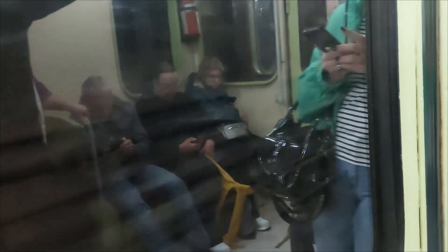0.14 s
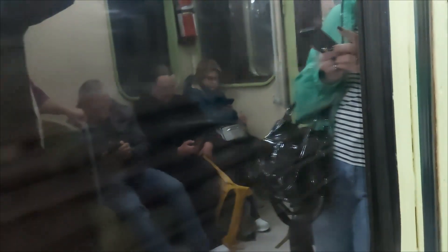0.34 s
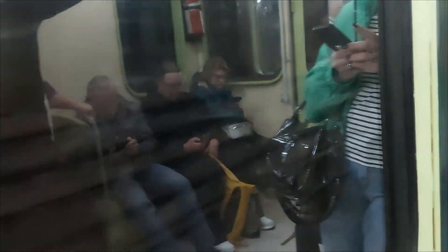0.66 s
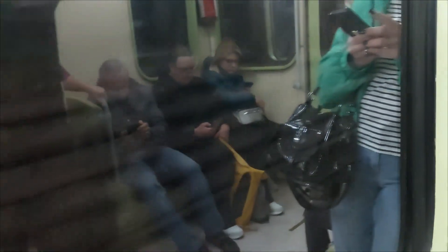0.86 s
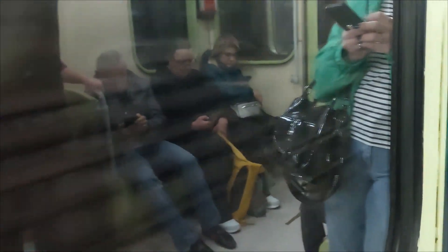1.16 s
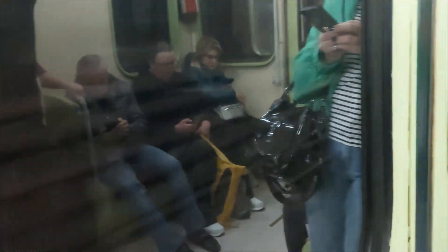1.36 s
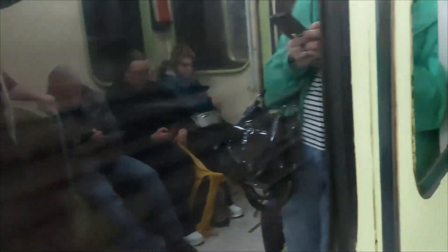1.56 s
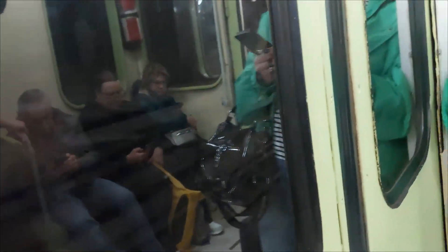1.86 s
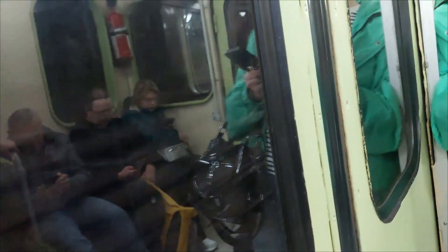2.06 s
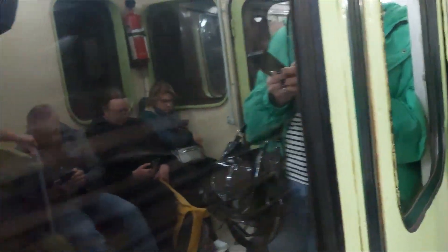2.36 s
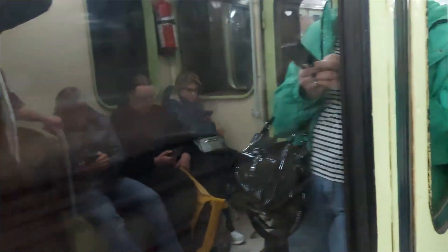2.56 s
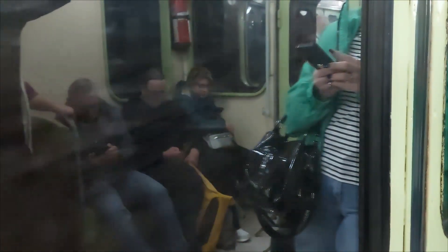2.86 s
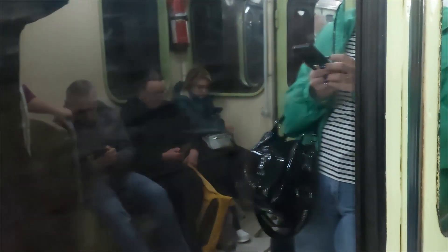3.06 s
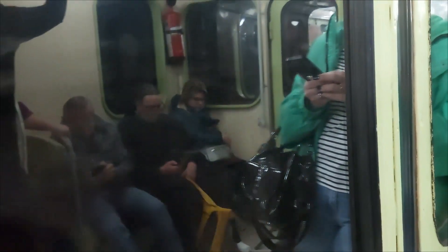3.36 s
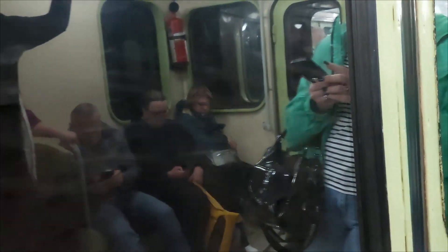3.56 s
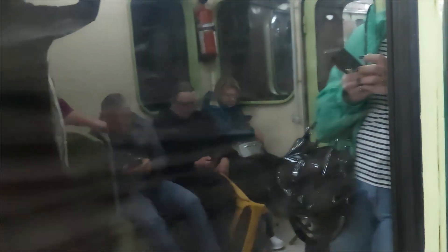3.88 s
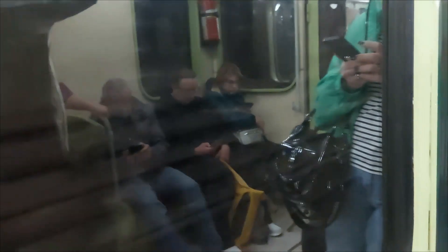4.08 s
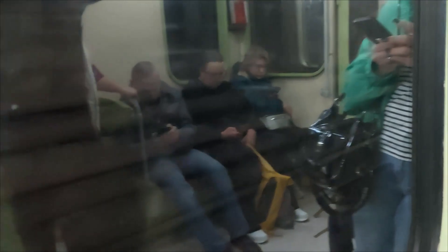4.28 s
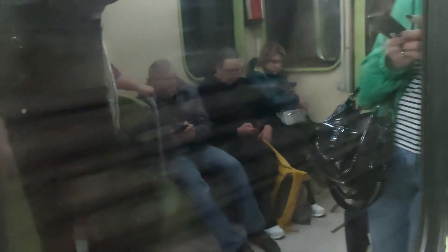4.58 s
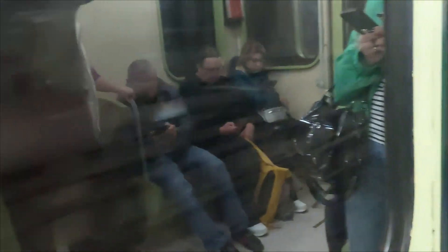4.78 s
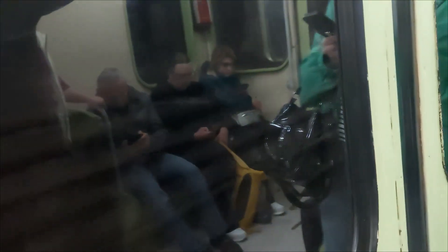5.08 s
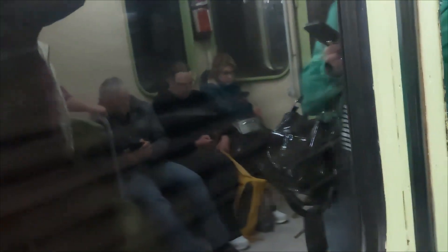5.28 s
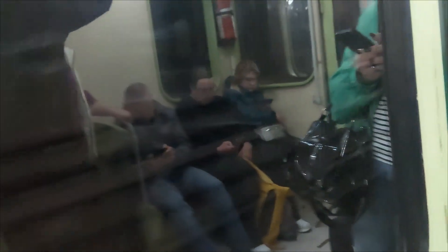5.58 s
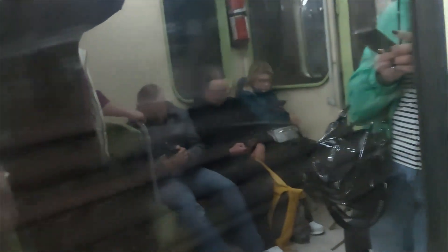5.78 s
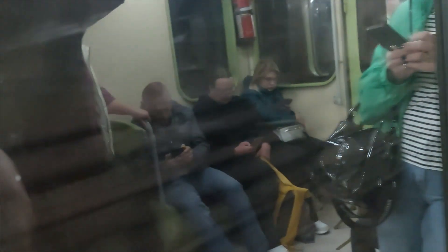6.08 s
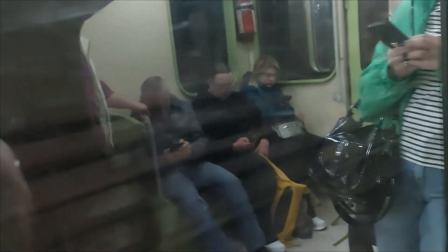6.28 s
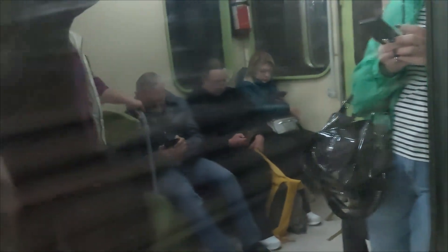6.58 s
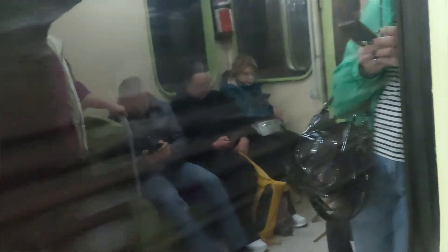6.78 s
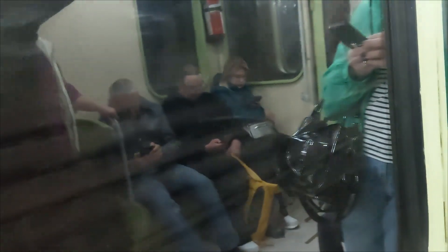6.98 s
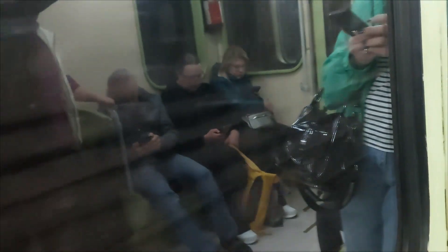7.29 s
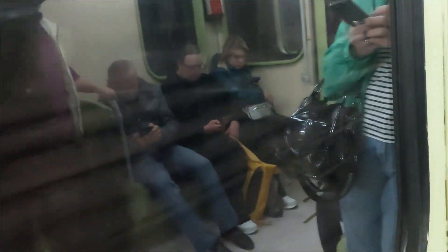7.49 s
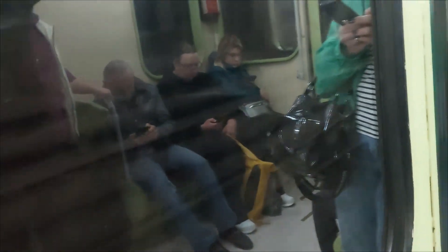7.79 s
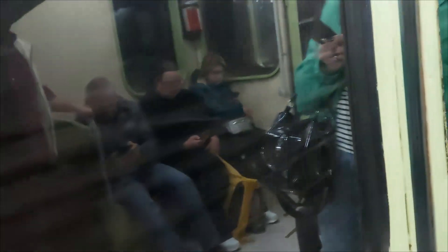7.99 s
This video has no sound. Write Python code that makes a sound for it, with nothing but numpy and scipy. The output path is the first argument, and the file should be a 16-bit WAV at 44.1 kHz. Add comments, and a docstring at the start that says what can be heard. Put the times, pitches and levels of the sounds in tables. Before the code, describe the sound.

Inside a subway car running through a tunnel, a steady wheel roar and floor rumble carry a throbbing low-mid drone that strengthens and rises slightly.

```python
"""Rolling noise inside a metro car in a tunnel: floor rumble, drumming panels, wheel roar and rail hiss from
shaped noise, varying along the track. Rippled rail adds a throbbing drone; gears whine as blurred tones.
Both dip slightly in pitch, then rise with the speed. The body booms and panels ring as narrow noise bands.
A flange grinds in surges, chirps, scrapes and sings faintly; a thin hiss flares and calms on straight track."""
import sys
import numpy as np
from scipy import signal
from scipy.fft import rfft, irfft, next_fast_len
from scipy.io import wavfile
from scipy.ndimage import uniform_filter1d, map_coordinates

SR = 44100
rng = np.random.default_rng(int(sys.argv[2]) if len(sys.argv) > 2 else 0)


def unload_audio(sound):
    """Save the sound as a 16-bit wav file, at the path given as the first command line argument."""
    columns = np.transpose(np.atleast_2d(sound))
    # keep every value between -1 and 1, then stretch to whole-number steps
    steps = np.round(np.clip(columns, -1, 1) * 32767)
    wavfile.write(sys.argv[1], SR, steps.astype(np.int16))


N = 358974
TIME = np.arange(N) / SR


def amp(db):
    """Decibels to gain."""
    return 10 ** (np.asarray(db) / 20)


def unit(x):
    """Scale to rms 1."""
    return x / np.sqrt(np.mean(np.abs(x) ** 2) + 1e-20)


def along(points, hz):
    """Each column of a frequency table, read on a log axis."""
    table_hz, *columns = np.transpose(points)
    return [np.interp(np.log(hz + 1), np.log(table_hz + 1), c) for c in columns]


def curves(rows):
    """One value per sample for each column after the time."""
    time_s, *columns = np.transpose(rows)
    return [np.interp(TIME, time_s, c) for c in columns]


def wobble(rate_hz, size=N):
    """Smooth random curve through rate_hz normal knots a second."""
    knots = rng.standard_normal(int(size * rate_hz / SR) + 4)
    return map_coordinates(knots, [TIME[:size] * rate_hz])


def swell(t, length_s):
    """Bell-shaped rise and fall around t = 0, length_s wide at half height."""
    return np.exp(-np.log(2) * (2 * t / length_s) ** 2)


def filtered(x, response):
    """Apply a response of frequency."""
    m = next_fast_len(N + SR // 2)
    return irfft(rfft(x, m) * response(np.fft.rfftfreq(m, 1 / SR)), m)[..., :N]


def rush(spectrum, patchy_db, resonances=()):
    """Two shaped noises, jointly of rms 1, with shared patches of random gain and lifted resonances."""
    z = signal.stft(rng.standard_normal((2, N)), nperseg=512)[2]
    patches = uniform_filter1d(rng.standard_normal(z.shape[1:]), size=6, axis=0)  # over frequency
    patches = uniform_filter1d(patches, size=16, axis=1)  # over time
    pair = signal.istft(z * amp(patchy_db * unit(patches)), nperseg=512)[1][:, :N]

    def response(hz):
        lift_db = sum(db / (1 + (2 * (hz - centre) / width) ** 2) for centre, width, db in resonances)
        return amp(along(spectrum, hz)[0] + lift_db)
    return unit(filtered(pair, response))


def flutter(width_hz, size=N):
    """Two complex envelopes, jointly of rms 1, that blur a tone; width_hz is taken at half amplitude."""
    m = next_fast_len(size)
    white = rng.standard_normal((2, m)) + 1j * rng.standard_normal((2, m))
    blur = 1 + (np.fft.fftfreq(m, 1 / SR) / (width_hz / 2)) ** 2
    return unit(np.fft.ifft(white / blur)[:, :size])


def bursts(rows):
    """Short swelling bands of noise."""
    out = np.zeros((2, N + 2 * SR))
    t = np.arange(SR) / SR - .5
    for s, hz, width_hz, db, length_s in rows:
        band = np.real(flutter(width_hz, size=SR) * np.exp(2j * np.pi * hz * t))
        start = round((s + .5) * SR)
        out[:, start:start + SR] += amp(db) * np.sqrt(2 * swell(t, length_s)) * band
    return out[:, SR:SR + N]


# level changes along the track: (time [s], length [s], shaking [dB before layer growth],
# roar [dB], boom [dB])
TRACK_CHANGES = [(0.354, .16, -3, -1, 2), (0.616, 0.14, 3, 0.5, -6), (1.66, 0.28, -2, -0.5, 12.5),
                 (1.908, .25, 4.5, -0.3, 2), (2.733, 0.15, 0, 4, 4), (3.191, 0.15, 0.5, 0, -0.5),
                 (4.4, .1, 2, -0.9, 0), (4.95, 0.4, 1, 0, 3.5), (5.425, 0.4, 0, 3, 5),
                 (5.429, .11, 2.5, 0.5, 12), (6.597, .7, 0.5, 0, 4.5), (7.898, 0.23, 0, -2.5, 9.5)]


def track_changes():
    """Brief rises and dips of shaking, roar and boom in dB along the track."""
    return sum(np.outer(change_db, swell(TIME - s, length_s)) for s, length_s, *change_db in TRACK_CHANGES)


# flange contacts: (time [s], rise of rail hiss [dB], hold [s])
GRINDS = [(.01, 3.5, 0.11), (0.427, 4.5, 0.071), (0.607, 3, .04), (0.718, 3.5, 0.033), (0.868, 2.5, 0.033),
          (1.085, 4, .08), (1.262, 3, .08), (1.535, 2.5, .04), (1.737, 4, 0.13), (1.95, 3, 0.067),
          (2.209, 1, .04), (2.345, 3.5, .08), (2.653, 1, 0.16), (3.004, 3, 0.094), (3.587, 1, .06)]
GRIND_ATTACK_S, GRIND_RELEASE_S = 0.035, 0.095


def grinding():
    """Rise in dB: each flange contact sets in before its listed time, holds and dies away."""
    def contact(t, hold_s):
        attack = np.clip(1 + t / GRIND_ATTACK_S, 0, 1)
        return attack * np.exp(-np.maximum(t - hold_s, 0) / GRIND_RELEASE_S)
    return np.max([db * contact(TIME - s, hold_s) for s, db, hold_s in GRINDS], axis=0)


# slow course of the ride: (time [s], floor rumble [dB], panel drumming [dB], rolling roar [dB])
RIDE = [(0, -32, -20, -25), (1.6, -34, -20.5, -25.5), (3.25, -34, -22, -24), (3.7, -36.5, -28, -23.5),
        (5, -36, -24, -21.5), (6.1, -36, -27.5, -26.5), (7, -39.5, -30.5, -27), (8.1, -40.5, -30.5, -26)]
# floor noise shape: (frequency [Hz], relative density [dB])
RUMBLE_SPECTRUM = [(20, -41.5), (33, -24.5), (50, -1.5), (70, -3), (105, -1.5), (135, -11.5), (200, -17.5),
                   (400, -60.5), (1500, -120)]
# floor resonances: (frequency [Hz], width [Hz], lift [dB])
FLOOR_MODES = [(57, 22, 4), (82.4, 20, 9.5), (134, 10, 2.5)]


def rumble():
    """The track shakes the floor, which resonates in the bass."""
    jolt_db = 1.3 * track_changes()[0]
    return amp(curves(RIDE)[0] + jolt_db) * rush(RUMBLE_SPECTRUM, patchy_db=0.0, resonances=FLOOR_MODES)


# panel noise shape: (frequency [Hz], relative density [dB])
PANEL_SPECTRUM = [(30, -61), (70, -22.5), (118, -5), (150, 1), (185, 0), (215, 5.5), (270, 3.5), (380, 1),
                  (435, -5), (490, -10), (800, -32.5), (2500, -120)]


def panels():
    """The shaken panels drum above the floor rumble."""
    jolt_db = 0.83 * track_changes()[0]
    return amp(curves(RIDE)[1] + jolt_db) * rush(PANEL_SPECTRUM, patchy_db=0.87)


# roar shape: (frequency [Hz], relative density [dB])
ROAR_SPECTRUM = [(30, -63), (150, -21), (280, 6.5), (370, 2), (435, 5), (475, -0.5), (560, 4), (680, 0),
                 (790, -3), (1010, -5.5), (1110, -2), (1240, -3.5), (1350, -11), (1800, -20.5),
                 (6000, -120)]


def roar():
    """The wheels roar in the tunnel, varying along the track and surging with the grinding."""
    level_db = curves(RIDE)[2] + track_changes()[1] + 0.95 * grinding()
    return amp(level_db) * rush(ROAR_SPECTRUM, patchy_db=1.0)


# rail hiss shape: (frequency [Hz], relative density [dB])
RAIL_SPECTRUM = [(300, -62), (900, -22), (1500, -2.5), (1800, -0.5), (2250, -0.5), (2700, -4), (3000, -4.5),
                 (3300, -9), (4000, -10.5), (5000, -19), (6000, -23), (7300, -22.5), (8500, -29.5),
                 (16000, -45.5)]
# rail hiss: (time [s], level [dB re roar course])
RAIL_LEVEL = [(0, -18.5), (2.3, -19.5), (3.3, -20), (4.5, -20.5), (5.2, -20), (6.2, -18.5), (8.1, -18)]


def rail_hiss():
    """The rails hiss with the rolling, surging where a flange grinds."""
    level_db = curves(RIDE)[2] + curves(RAIL_LEVEL)[0]
    surge_db = 0.4 * track_changes()[1] + grinding()
    return amp(level_db + surge_db + 0.56 * wobble(45)) * rush(RAIL_SPECTRUM, patchy_db=0.76)


# rail ripples passing the wheels, proportional to speed: (time [s], drone pitch [Hz])
RIPPLE_PITCH = [(0, 318), (2.5, 316), (4, 315), (5.5, 317), (6.3, 321), (7.1, 326), (7.65, 334), (8.1, 337)]


def ripple_phase():
    """Phase of the rail ripples passing under the wheels."""
    return 2 * np.pi * np.cumsum(curves(RIPPLE_PITCH)[0]) / SR


# drone: (time [s], level [dB])
DRONE_LEVEL = [(0, -26), (.7, -22), (1.7, -27.5), (2.5, -23.5), (3.3, -17.5), (3.55, -23.5), (3.75, -17.5),
               (4.35, -19.5), (4.95, -21), (5.9, -16.5), (6.35, -18), (7.1, -17), (7.6, -18), (8.1, -18)]
# loud throbs of the drone: (time [s], peak level [dB], length [s])
THROBS = [(1.307, -12.5, 0.026), (2.849, -14.5, 0.037), (2.987, -14.5, 0.035), (3.191, -12, 0.016),
          (3.264, -15, .044), (3.629, -14.5, 0.016), (3.751, -15, 0.023), (3.824, -11, 0.015),
          (3.983, -13, 0.023), (4.335, -13, 0.03), (4.386, -13, 0.04), (4.586, -15, .03),
          (5.225, -11.5, 0.0087), (5.349, -12, 0.027), (5.461, -14, .025), (5.534, -5.5, 0.02),
          (5.6, -11.5, 0.016), (5.659, -8.5, 0.03), (5.731, -8, 0.019), (5.787, -9, 0.015),
          (5.841, -9, 0.028), (5.918, -10.5, .02), (5.954, -8.5, 0.04), (6.126, -9.5, 0.023),
          (6.272, -6.5, 0.014), (6.305, -8, 0.022), (6.395, -12.5, .04), (6.541, -10, 0.019),
          (6.767, -7.5, 0.032), (6.86, -11, .026), (6.903, -12, .022), (6.998, -8, 0.014),
          (7.08, -7.5, 0.046), (7.154, -8, 0.026), (7.329, -12, 0.03), (7.479, -8, 0.024),
          (7.58, -10, 0.028), (7.701, -12, 0.018)]


def drone(core_db, beat_db, waver_hz):
    """Wheels on rippled rail: a narrow tone with quick random beats and some loud throbs."""
    tone = amp(core_db) * flutter(width_hz=19) + amp(beat_db) * flutter(width_hz=54)
    slow_power = uniform_filter1d(np.abs(tone) ** 2, size=SR // 8, axis=1)
    tone /= np.sqrt(np.abs(slow_power))  # quick beats, even slow level
    tone *= amp(curves(DRONE_LEVEL)[0])
    for s, db, length_s in THROBS:
        throb = swell(TIME - s, length_s)
        heading = np.exp(1j * np.angle(np.sum(throb * tone[0])))
        waver = np.exp(2j * np.pi * waver_hz * rng.standard_normal() * (TIME - s))
        tone[0] += throb * (amp(db) * heading * waver - tone[0])
    return np.sqrt(2) * np.real(tone * np.exp(1j * ripple_phase()))


# gear whine: (time [s], gain [dB])
GEAR_LEVEL = [(0, -58), (3, -53.5), (5.3, -41), (6.2, -37.5), (7.3, -38), (8.1, -38.5)]
# gear lines: (multiple of drone pitch, width [Hz], gain at WHINE_S [dB re gear gain], growth [dB/s])
GEAR_LINES = [(1.49, 29.84, -9, 3.5), (1.97, 69.6, 5.5, 0.5), (2.92, 84.8, 1.5, -2.3),
              (3.2, 54.6, -1.5, 3.5), (3.9, 80.2, -2.5, -1), (4.12, 89.9, 2, .8), (4.97, 110.6, -8, 0)]
WHINE_S = 7.0


def whine():
    """Blurred lines of the running gear follow the speed; some grow as others fade."""
    phase = ripple_phase()
    lines = 0
    for order, width_hz, db, growth_db_per_s in GEAR_LINES:
        line = np.real(flutter(width_hz) * np.exp(1j * order * phase))
        lines = lines + amp(db + growth_db_per_s * (TIME - WHINE_S)) * line
    return amp(curves(GEAR_LEVEL)[0]) * lines


def boom(pitch_hz, width_hz, re_panels_db):
    """One low resonance of the car body swells now and then."""
    level_db = curves(RIDE)[1] + re_panels_db + track_changes()[2]
    return amp(level_db) * unit(np.real(flutter(width_hz) * np.exp(2j * np.pi * pitch_hz * TIME)))


def tunnel(x, t60_s):
    """The walls smear a short sound into two fresh decaying tails, keeping its energy."""
    t = np.arange(SR // 2) / SR
    tail = rng.standard_normal((2, len(t))) * amp(-60 * t / t60_s)
    return unit(signal.fftconvolve(x[None], tail, axes=1)[:, :len(x)]) * np.std(x)


# flange chirps: (time [s], pitch [Hz], level before tunnel smear [dB], length [s], octave [dB re tone])
CHIRPS = [(0.045, 6350, -59, .07, -25), (0.831, 7060, -53.5, 0.082, -25), (.85, 9660, -61.5, 0.045, -25),
          (1.035, 7230, -54, 0.03, -27), (1.098, 6900, -60, .04, -25), (1.29, 6880, -59, .06, -23),
          (1.3, 9330, -62, .07, -23), (1.43, 7150, -66, 0.054, -23), (1.555, 6940, -57, .06, -23),
          (1.717, 6500, -42, 0.054, -17), (1.756, 6850, -55, .09, -27), (1.808, 6600, -50, .018, -25),
          (2.219, 7030, -56.5, 0.051, -26), (2.239, 2380, -45.5, 0.12, -12), (2.36, 6470, -57, 0.054, -25),
          (3.042, 6470, -58, 0.18, -14), (3.053, 3560, -46.5, 0.042, -22), (3.585, 4200, -47.5, 0.028, -23),
          (3.615, 2113, -39.5, 0.1, -23), (3.686, 6370, -46, 0.047, -15.5), (3.79, 6400, -56, .06, -24),
          (4.197, 6700, -64, .05, -23), (4.712, 6280, -58, .06, -20), (4.75, 1860, -41.5, 0.069, -28),
          (5.045, 6440, -52, .08, -15), (5.075, 9400, -58, .025, -27), (5.088, 7100, -55, .025, -21),
          (5.471, 4260, -59, 0.11, -24), (5.613, 2090, -42.5, .05, -21)]


def chirps(sag_per_s, t60_s, octave_t60_s, ragged_db):
    """Flange stick-slip makes the wheel sing a ragged, sagging tone; its octave needs the hardest contact."""
    out = np.zeros((2, N + 2 * SR))
    t = np.arange(SR) / SR - .5
    for s, hz, db, length_s, octave_db in CHIRPS:
        slip_hz = (55 + .021 * hz) * flutter(width_hz=300, size=SR)[0].real
        phase = 2 * np.pi * np.cumsum(hz * (1 - sag_per_s * t) + slip_hz) / SR
        contact = swell(t, length_s)
        tone = tunnel(np.sqrt(2 * contact) * np.sin(phase), t60_s)
        octave = tunnel(np.sqrt(2) * contact * np.sin(2 * phase), octave_t60_s)
        chatter = unit(amp(ragged_db * wobble(170, size=SR)))
        start = round((s + .5) * SR)
        out[:, start:start + SR] += amp(db) * chatter * (tone + amp(octave_db) * octave)
    return out[:, SR:SR + N]


# scraping noise: (time [s], centre [Hz], width [Hz], level [dB], length [s])
SCRAPES = [(.322, 10200, 3500, -59.5, 0.054), (2.025, 7800, 7000, -61, .03),
           (2.636, 11600, 1480, -57.5, 0.06), (3.05, 2210, 895, -43.5, 0.12),
           (3.06, 3580, 2400, -46.5, 0.066), (3.68, 2116, 201, -45, .1), (3.78, 9400, 3940, -56.5, 0.052),
           (5.1, 2298, 645, -43.5, .28), (5.0, 4290, 700, -54, .08), (5.63, 2100, 200, -49, .09)]


def scrapes():
    """Noise bands, mostly broad, as steel slides on steel; two narrow ones roughen the 2.1 kHz chirps."""
    return bursts(SCRAPES)


# flange singing: (time [s], level [dB])
SINGING_LEVEL = [(0, -73), (.5, -69), (.85, -76), (1.7, -61), (2.25, -70), (2.6, -72), (5.1, -73),
                 (8.1, -87)]


def singing(pitch_hz, upper_hz, upper_db, width_hz, ragged_db, drift_hz):
    """The brushing flange makes two wheel modes sing faintly, drifting in pitch together."""
    drift_cycles = drift_hz * np.cumsum(wobble(6)) / SR

    def mode(hz):
        return np.real(flutter(width_hz) * np.exp(2j * np.pi * (hz * TIME + drift_cycles)))
    tone = mode(pitch_hz) + amp(upper_db) * mode(upper_hz)
    return amp(curves(SINGING_LEVEL)[0]) * unit(amp(ragged_db * wobble(20)) * tone)


# thin hiss shape: (frequency [Hz], relative density [dB])
THIN_SPECTRUM = [(1000, -62), (2500, -9), (5000, 8.5), (7600, 4), (8600, 1.5), (10000, 0.5), (12500, -2),
                 (14000, -5.5), (15800, -10.5)]
# thin hiss: (time [s], level [dB])
THIN_LEVEL = [(0, -61), (1.6, -60), (2.7, -61), (3.35, -62.5), (3.8, -63), (4.9, -61.5), (5.5, -57),
              (6.3, -57.5), (8.1, -55.5)]
# hiss flares: (time [s], rise [dB], length [s])
FLARES = [(0.321, 7, .06), (0.757, 7, .07), (0.906, 6, .07), (1.105, 3, 0.044), (1.455, 4.2, 0.18),
          (1.776, 5.5, .12), (2.047, 7.5, 0.13), (2.381, 3, .1), (2.533, 3.5, .1), (2.664, 6, 0.17),
          (3.066, 6.5, .16), (3.626, 7, .04), (3.795, 6.5, 0.099), (4.117, 3.5, .04), (4.441, 6, 0.036),
          (4.613, 4.5, .04), (4.766, 4.5, .07), (5.144, 4.5, .11), (5.397, 4.5, .05), (5.52, 3.5, .08),
          (5.808, 2, 0.11), (6.101, 1.5, .05), (6.948, 3, .03), (7.318, 2.5, 0.046), (7.912, 2, .05)]
STRAIGHT_S, EASE_S = 6.0, .8  # rubbing eases off over EASE_S, ending at STRAIGHT_S


def thin_hiss():
    """Thin noise flares now and then and stays restless while the flange rubs."""
    rubbing = np.clip((STRAIGHT_S - TIME) / EASE_S, 0, 1)
    flicker_db, unrest_db = 0.99 * wobble(55), 1.4 * wobble(22)
    flares_db = sum(db * swell(TIME - s, length_s) for s, db, length_s in FLARES)
    level_db = curves(THIN_LEVEL)[0] + flares_db + rubbing * unrest_db + flicker_db
    return amp(level_db) * rush(THIN_SPECTRUM, patchy_db=1.8)


# panel rings: (time [s], pitch [Hz], width [Hz], level [dB], length [s])
RINGS = [(.465, 431, 45, -23, 0.048), (3.18, 435, 35, -24.5, .17), (5.2, 553, 45, -28, 0.075),
         (7.95, 508, 25, -33.5, .3)]


def rings():
    """A panel rings briefly and softly: narrow noise bands."""
    return bursts(RINGS)


# microphone pair, nominal: (frequency [Hz], coherence, left phase lead [rad], left minus right [dB])
PORTS = [(60, .96, 0, -1.4), (180, .95, .12, -2.4), (250, .86, .55, -1), (320, .86, .8, 1.6),
         (440, .68, 1, 1.8), (540, .42, 1.5, 4), (720, .3, 1.9, .6), (1000, .25, 2.2, 3.2),
         (1330, .5, 4, 4.3), (1800, .18, 5.6, 4.4), (2250, .2, 7.5, 3.8), (2600, .15, 8.2, .8),
         (7000, .03, 9, 1.6), (13000, .03, 9, 5)]


def microphones(pair):
    """Two unrelated fields mix into two ports: alike in the bass, left leading and mostly louder higher up."""
    def port(side):
        def response(hz):
            alike, lead_rad, balance_db = along(PORTS, hz)
            turn = np.arccos(np.clip(alike, 0, 1)) / 2
            mix = np.array([np.cos(turn), side * np.sin(turn)])
            return mix * amp(side * balance_db / 2) * np.exp(.5j * side * lead_rad)
        return filtered(pair, response).sum(axis=0)
    return np.array([port(0.96), port(-0.97)])  # left, right


def scene():
    """Sum the running noise and the flange sounds at the microphones."""
    running = rumble() + panels() + roar() + rail_hiss()
    running += drone(core_db=-3.0, beat_db=-1.0, waver_hz=3.2) + whine()
    running += boom(pitch_hz=124.2, width_hz=32, re_panels_db=-16.5) + rings()
    flanges = chirps(sag_per_s=0.1, t60_s=0.46, octave_t60_s=.3, ragged_db=1.5) + scrapes() + thin_hiss()
    flanges += singing(pitch_hz=7330, upper_hz=9400, upper_db=-6.0, width_hz=380, ragged_db=4.0, drift_hz=90)
    return microphones(running + flanges)


TOP_HZ = 15760


def record(dry):
    """Keep nothing at or above the band limit."""
    return filtered(dry, lambda hz: hz < TOP_HZ)


dry = scene()
out = record(dry)
unload_audio(out)
```